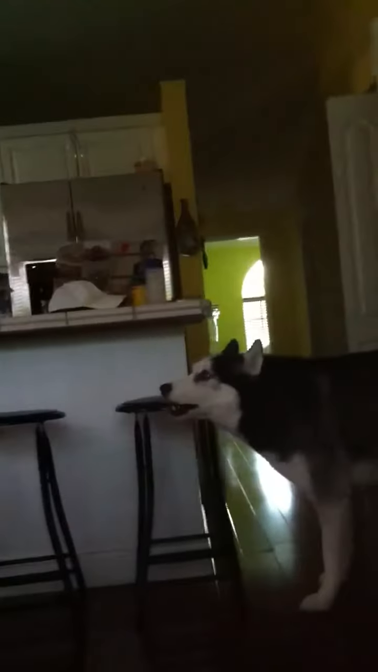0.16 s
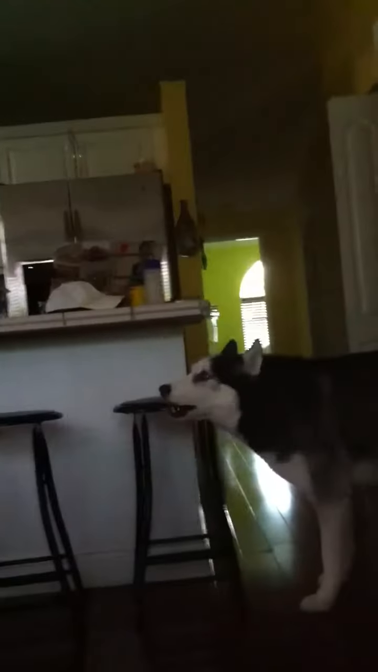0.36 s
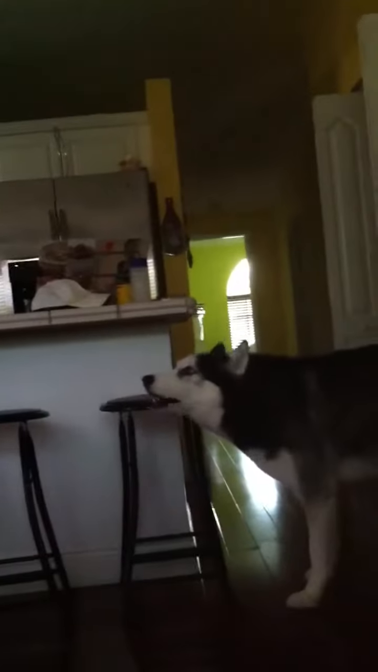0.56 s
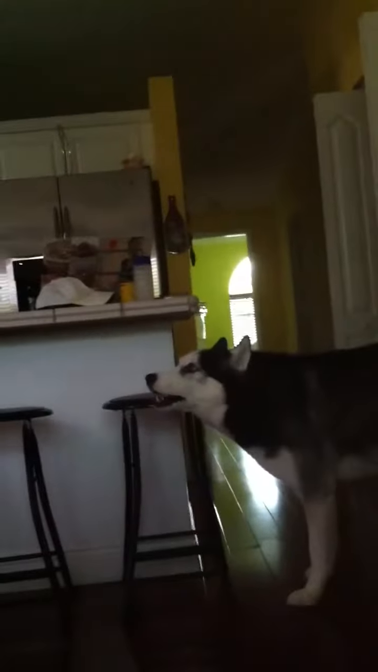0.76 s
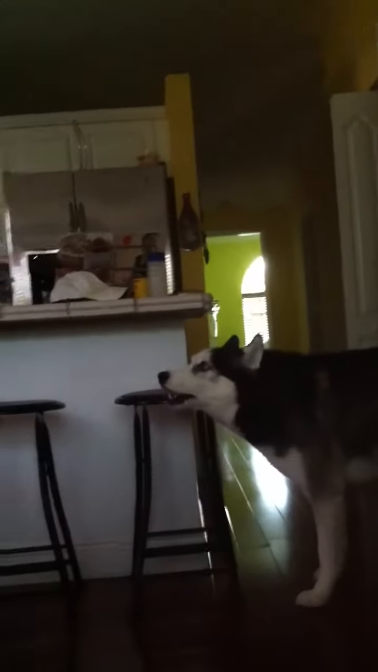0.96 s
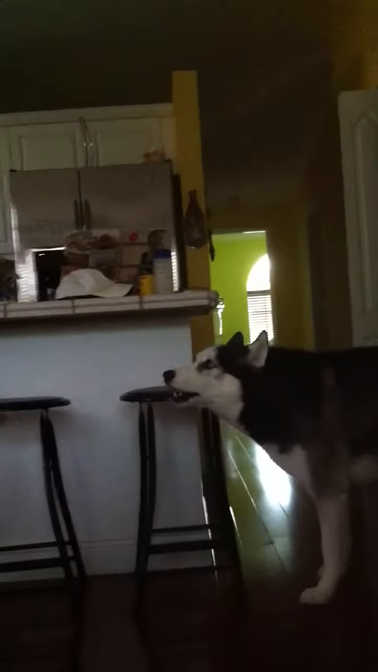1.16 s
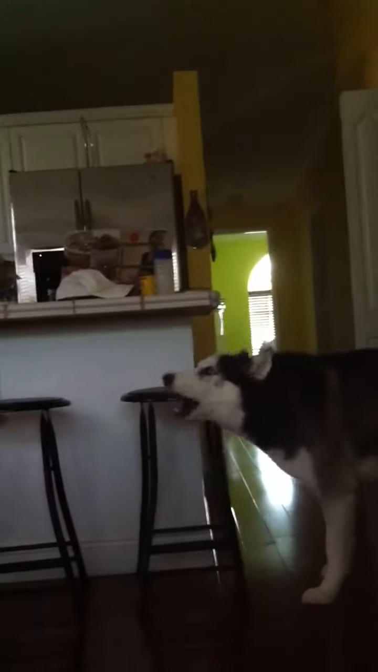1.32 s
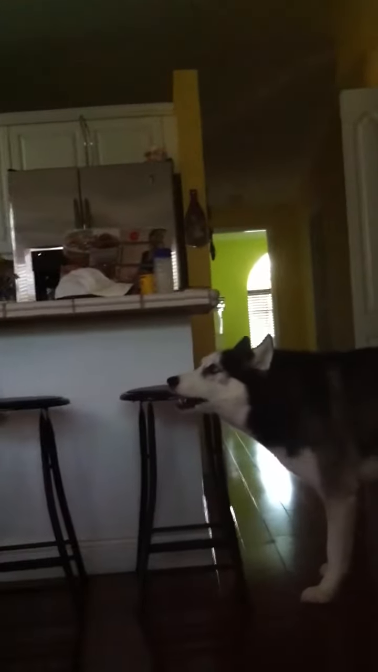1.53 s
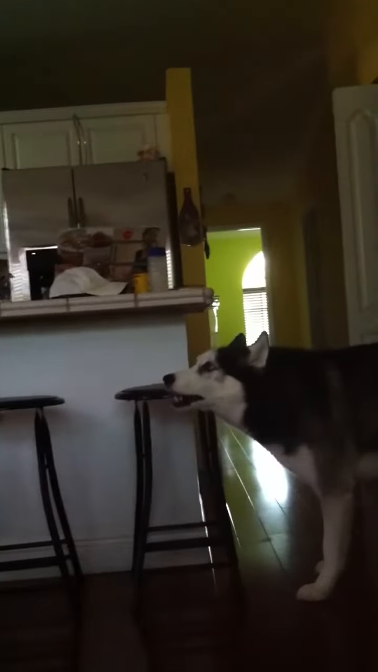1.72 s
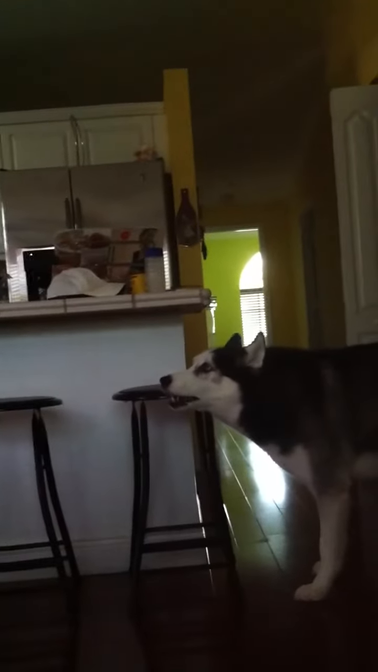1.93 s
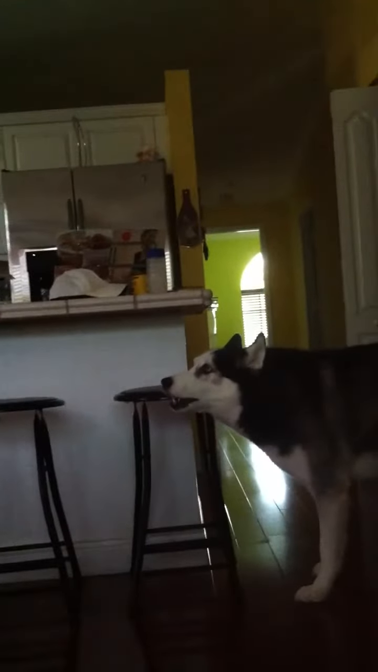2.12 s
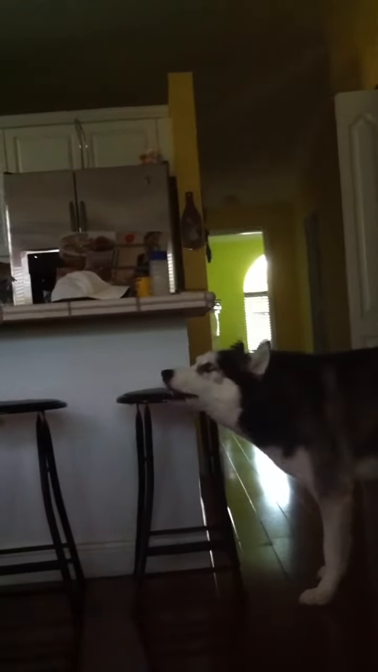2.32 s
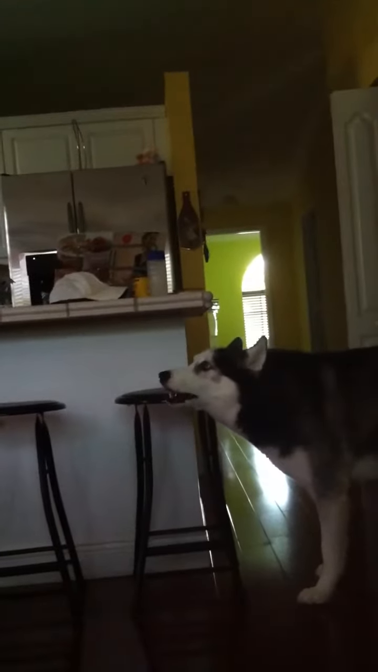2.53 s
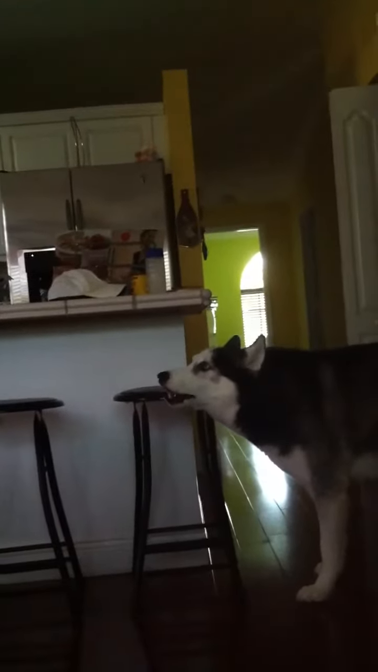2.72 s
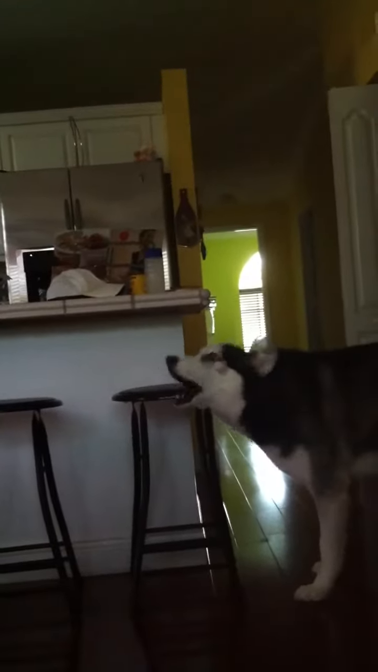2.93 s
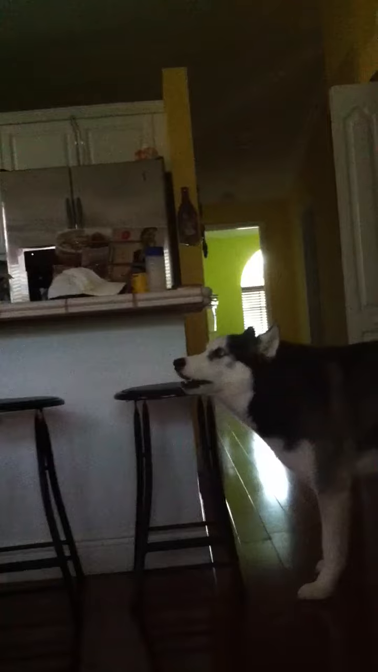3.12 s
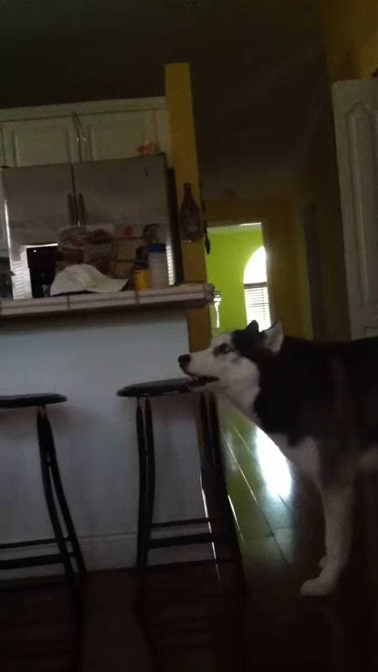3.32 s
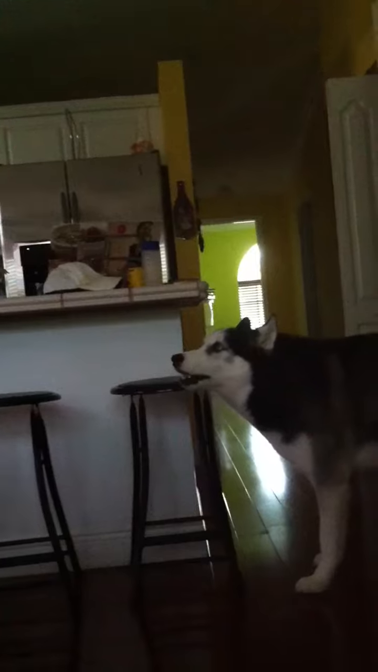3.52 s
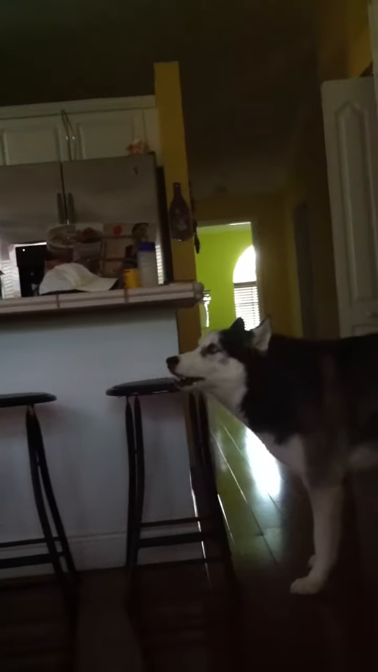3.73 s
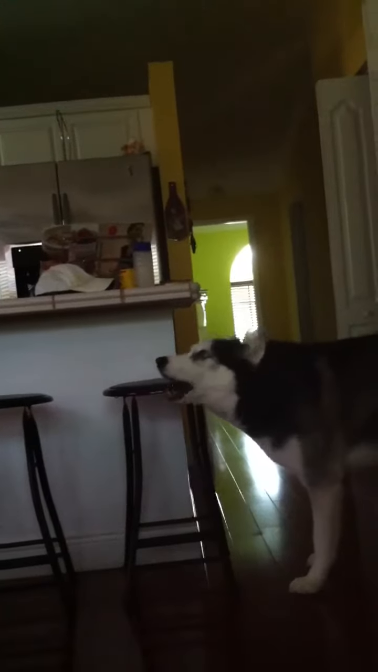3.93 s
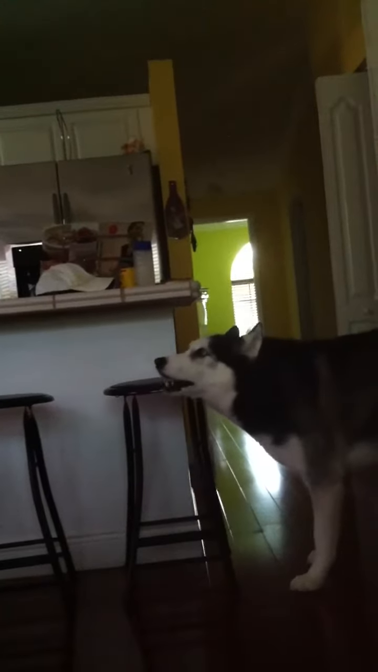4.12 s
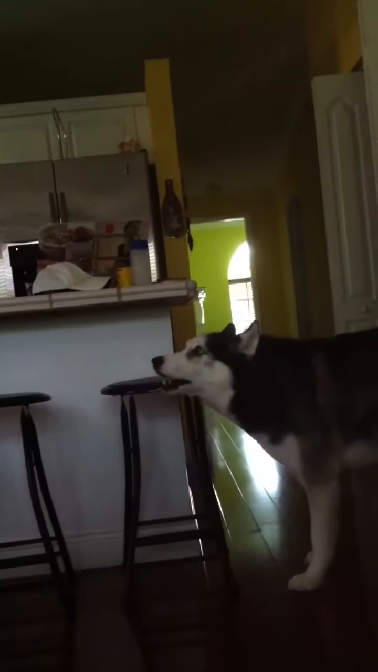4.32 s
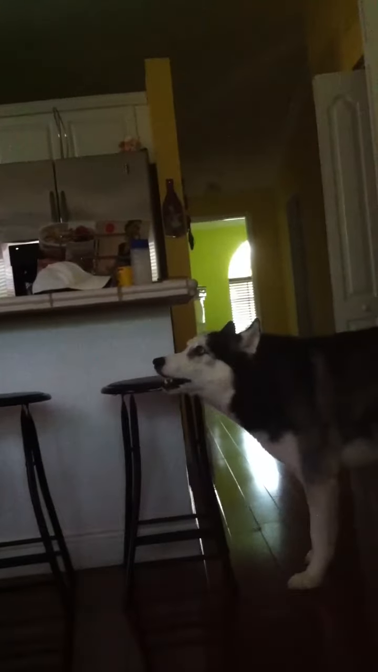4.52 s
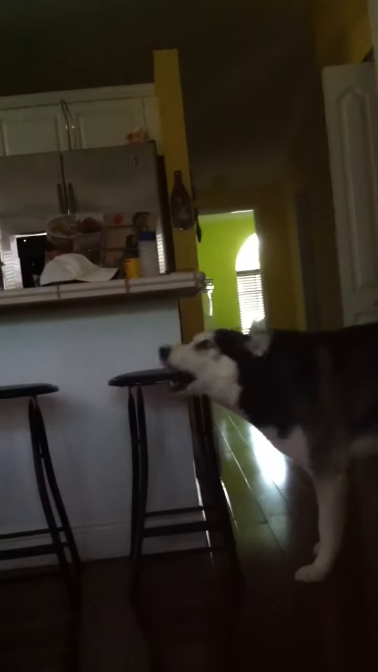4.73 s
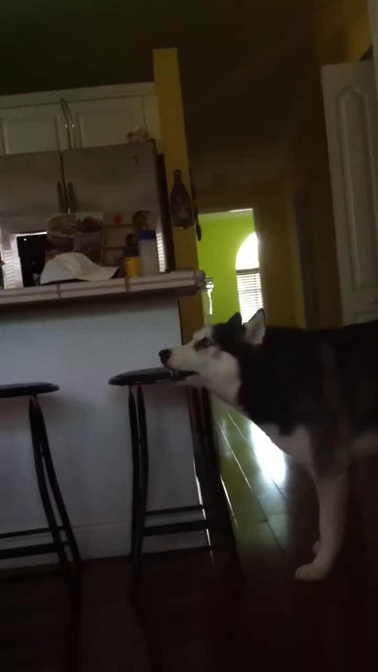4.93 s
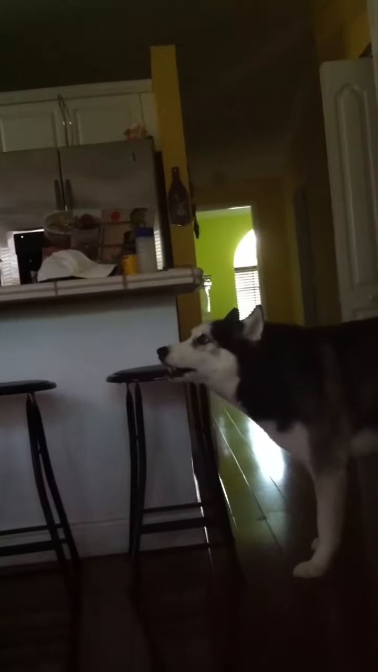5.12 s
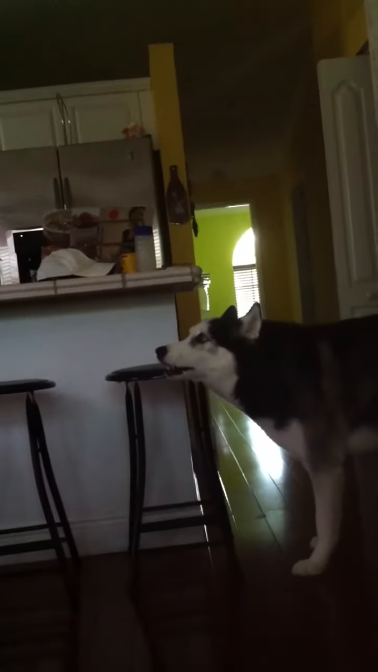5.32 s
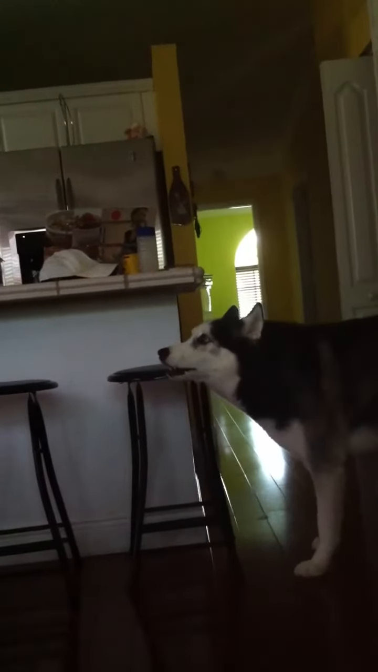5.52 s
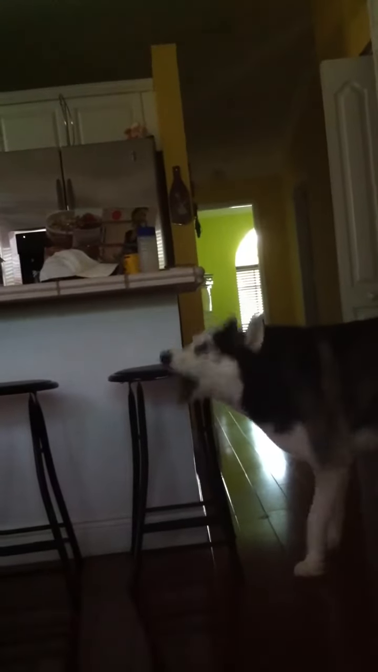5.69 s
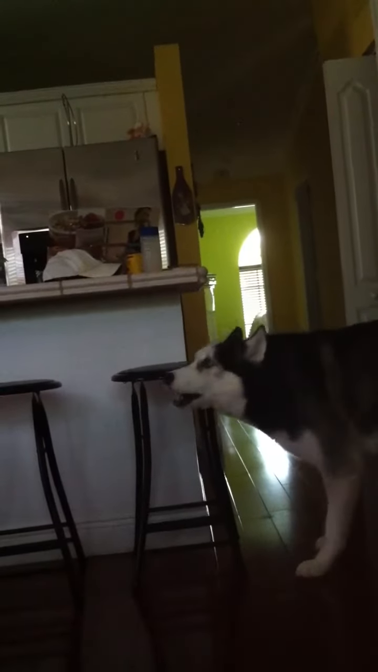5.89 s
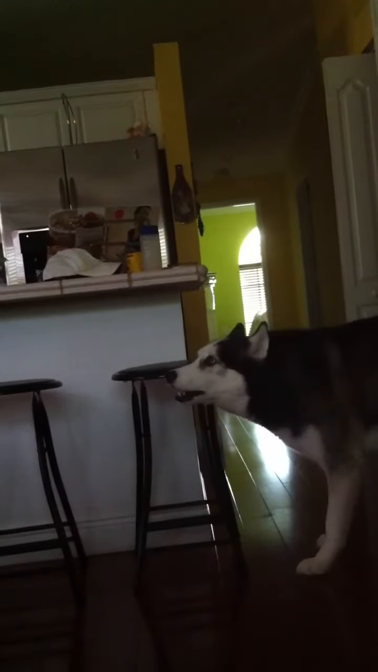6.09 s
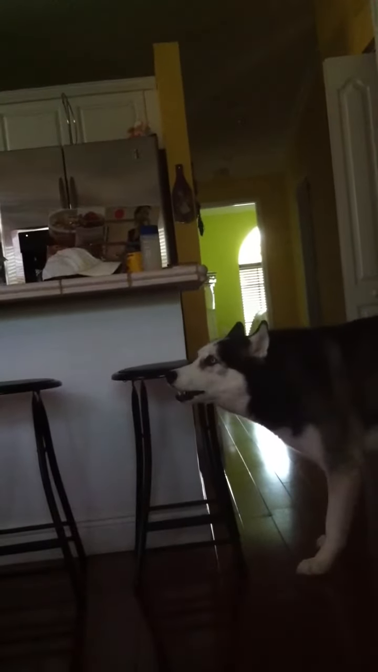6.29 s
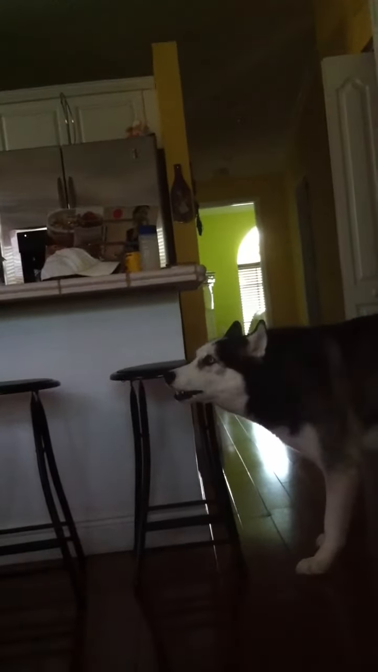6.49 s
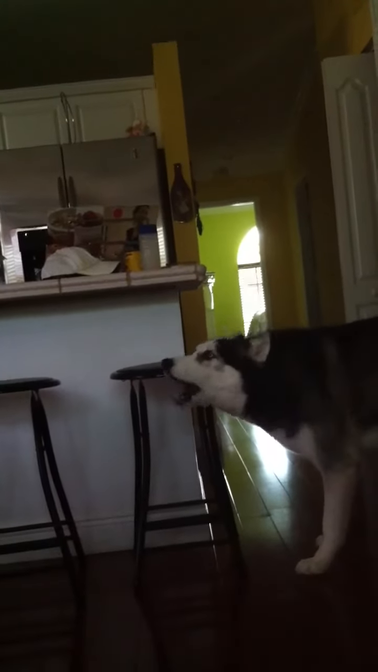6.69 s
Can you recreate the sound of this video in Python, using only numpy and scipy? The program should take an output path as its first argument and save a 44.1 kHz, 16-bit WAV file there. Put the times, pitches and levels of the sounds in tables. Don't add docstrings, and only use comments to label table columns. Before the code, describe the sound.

Echo first, then eight regular barks.

```python
import sys
import numpy as np
from scipy import signal
from scipy.fft import rfft, irfft
from scipy.io import wavfile
from scipy.ndimage import uniform_filter1d, minimum_filter1d

SR = 44100
rng = np.random.default_rng(int(sys.argv[2]) if len(sys.argv) > 2 else 0)


def level_to_linear(level):
    exponent = np.asarray(level, float) / 20
    return 10 ** exponent


def inscribe(sig):
    pcm = np.round(np.clip(np.atleast_2d(sig).T, -1, 1) * 32767)
    wavfile.write(sys.argv[1], SR, pcm.astype(np.int16))


N = 297675

# (voice breaks out [s], growl before it [s], swell to the crest [s], crest [dB],
# length after the crest [s])
BARKS = [
    (-.45, 0.053, 0.043, -4, 0.058),
    (.48, .08, 0.011, -7, 0.14),
    (1.314, .038, 0.025, -6, 0.094),
    (2.232, 0.051, 0.027, -8.5, 0.11),
    (2.953, .041, 0.0066, -4.5, 0.1),
    (3.915, 0.079, 0.0083, -7, 0.15),
    (4.724, .041, 0.026, -6, 0.085),
    (5.75, .033, 0.02, -7, 0.089),
    (6.688, .105, 0.011, -5.5, .1),
]
# (locked pitch [Hz], final pitch [Hz], roughness [0-1], half-pitch share [0-1])
VOICES = [(520, 545, .6, .4), (500, 575, .55, .4), (520, 580, .5, .45), (525, 572, .6, .5),
          (520, 570, .6, .45), (518, 585, .6, .4), (530, 540, .6, .5), (505, 535, .5, .45),
          (500, 530, .45, .4)]
# (mouth [dB], muzzle [dB], clear tone [dB], breath [dB])
COLOURS = [(-2, -1, 0.5, -46), (-0.5, -1.5, -1.5, -34.5), (-1, 1, 0, -32.5), (-1.5, 5, 0, -31.5),
           (0.5, 0.5, -3, -32.5), (-2.5, 2.5, 0, -32), (-1.5, 1, -2.5, -33), (-1.5, -2.5, 1, -32.5),
           (-2, -3, -0.5, -37.5)]
# (centre [Hz], width [Hz], level [dB])
THROAT = [(543.7, 262, -5), (743.5, 177, -6.5), (869, 150, -1), (952, 351, -12.5)]
# (centre [Hz], width [Hz], level [dB])
MOUTH_OPEN = [(1318, 354, 4), (1658, 440, -8)]
# (centre [Hz], width [Hz], level [dB])
MOUTH_SHUT = [(1428, 335, 10)]
# (centre [Hz], width [Hz], level [dB])
MUZZLE_OPEN = [(1915, 250, 12), (2338, 300, 5.5), (3090, 64, -3)]
# (centre [Hz], width [Hz], level [dB])
MUZZLE_SHUT = [(2337, 160, 4.5), (2880, 180, -15.5)]
# (centre [Hz], width [Hz], level [dB])
BREATH = [(4340, 840, -10.5), (5786, 530, -2.5), (6700, 600, -5.5), (10430, 2700, -12.5),
          (15400, 1600, -22)]
# (centre [Hz], width [Hz], level [dB])
CHEST = [(113, 49, -22.5), (185.5, 20, -13.5), (387, 76.5, 1)]
# (frequency [Hz], fall by 60 dB [s])
ROOM_RING = [(120, 0.52), (200, .7), (340, 0.56), (520, 0.76), (1000, 1), (2000, 1), (6000, 0.93),
             (11000, 0.51)]
# (frequency [Hz], level [dB], fall by 60 dB [s])
STANDING_WAVES = [(397, -59.5, 0.22), (453, -68, 0.56), (537.2, -55, 0.37), (569, -69, 0.84),
                  (716, -67, 0.15), (882.5, -62.5, 0.78), (982, -56.5, 0.76), (1364, -77, 0.54)]
# (frequency [Hz], density [dB per Hz])
HUSH_SPECTRUM = [(20, -46.5), (60, -31), (125, -8.5), (195, 1.5), (280, -5), (500, -12.5), (950, -15),
                 (1600, -2.5), (3000, -13), (6000, -16), (10000, -22), (13000, -24.5), (16000, -31.5)]

LEAD = SR // 2 + SR // 10
BREAK_DB, RISE_DB_PER_S, SAG_DB_PER_S, MURMUR_DB = -6, 619, 111.5, -48.5
OPENING_S, RELEASE_S = 0.0064, 0.017
GROWL_HZ, GROWL_SHARE = 156, .86
LEAP_AT_S, LEAP_S, LIFT_AT_S, LIFT_S = -.016, .026, .045, .045
MOUTH_DB, MOUTH_OPENS_DB, MOUTH_OPENS_S = -14, 12, 0.086
MUZZLE_DB, MUZZLE_RISE_DB_PER_S, MUZZLE_DROP_DB, MUZZLE_DROP_S = 1.5, 121.5, 13.5, 0.028
CLEAR_DB, CLEAR_DIP_DB, CLEAR_DIP_S = 0.5, 4.5, 0.05
THROAT_FLOOR_HZ, VOICE_TOP_HZ = 296, 3190
ROOM_DB, HUSH_DB = -2, -62
MIC_CUT_HZ, DRAIN_HZ, MIC_TOP_HZ = 56, 25.1, 16160
CEILING, HOLD = .71, 40


def dog():
    out = np.zeros(LEAD + N + SR)
    for timing, voice, colour in zip(BARKS, VOICES, COLOURS):
        start, sound = bark(timing, voice, colour)
        out[start:start + len(sound)] += sound
    return out


def bark(timing, character, colour):
    break_s, growl, swell, crest_db, length = timing
    lock_hz, final_hz, rough, half = character
    mouth_db, muzzle_db, clear_db, breath_db = colour
    t = -growl + np.arange(SR // 3) / SR
    before = np.minimum(t, 0)

    effort_db = crest_db + RISE_DB_PER_S * before + BREAK_DB * (1 - ramp(t, 0, swell))
    effort_db -= SAG_DB_PER_S * np.maximum(t - swell, 0)
    effort_db = np.where(t < 0, np.maximum(effort_db, MURMUR_DB), effort_db)
    pitch_hz = lock_hz * (GROWL_SHARE + (1 - GROWL_SHARE) * ramp(t, LEAP_AT_S, LEAP_S))
    pitch_hz += (final_hz - lock_hz) * ramp(t, LIFT_AT_S, LIFT_S)
    mouth_db = mouth_db + MOUTH_DB + MOUTH_OPENS_DB * np.clip(t / MOUTH_OPENS_S, -1, 1)
    muzzle_db = muzzle_db + MUZZLE_DB + MUZZLE_RISE_DB_PER_S * before
    muzzle_db = muzzle_db - MUZZLE_DROP_DB * ramp(t, 0, MUZZLE_DROP_S)
    clear_db = clear_db + CLEAR_DB - CLEAR_DIP_DB * np.exp(-(t / CLEAR_DIP_S) ** 2)

    since = t - t[np.argmax(effort_db > -24)]
    locked = ramp(since, 0, .045)
    jaws = ramp(since, .03, 0.082)
    voice, air, swing = folds(pitch_hz, locked, rough, half)

    throat_floor = signal.butter(4, THROAT_FLOOR_HZ, "high", fs=SR, output="sos")
    throat = signal.sosfilt(throat_floor, resonate(voice, THROAT))
    chest = level_to_linear(-1.5 - 14.1 * locked) * resonate(air, CHEST)
    sound = (throat + chest) / np.std(throat) + level_to_linear(clear_db + 6.0) * swing
    mouth = (1 - jaws) * resonate(voice, MOUTH_SHUT) + jaws * resonate(voice, MOUTH_OPEN)
    sound += level_to_linear(mouth_db) * rms_one(mouth)
    muzzle = (1 - jaws) * resonate(voice, MUZZLE_SHUT) + jaws * resonate(voice, MUZZLE_OPEN)
    sound += level_to_linear(muzzle_db) * rms_one(muzzle)
    sound = signal.sosfilt(signal.butter(6, VOICE_TOP_HZ, fs=SR, output="sos"), sound)
    hiss_db = breath_db + 5.34 * jaws + 2.2 * wander(len(t), 30)
    sound += level_to_linear(hiss_db) * rms_one(resonate(air, BREATH))

    opening = ramp(t, -growl, OPENING_S) ** 2
    closing = np.exp(-np.maximum(t - swell - length, 0) / RELEASE_S)
    start = round((break_s + t[0]) * SR) + LEAD
    return start, level_to_linear(effort_db - 4) * opening * closing * sound


def folds(pitch_hz, locked, rough, half):
    size = len(pitch_hz)
    turns = np.cumsum(pitch_hz * (1 + 0.033 * rough * wander(size, 60))) / SR
    closing = np.diff(np.floor(turns), prepend=0)
    strong_weak = 1 + half * (-1) ** np.floor(turns) * (1 + .5 * wander(size, 35))
    uneven = level_to_linear(11.25 * rough * rng.standard_normal(size))
    pulses = rms_one(closing * strong_weak * uneven)
    slaps = np.cumsum(GROWL_HZ * (1 + 0.27 * wander(size, 40))) / SR
    growl_puffs = np.exp(-2.5 * (slaps % 1))
    voice_puffs = np.exp(-1.5 * (turns % 1))
    puffs = growl_puffs * (1 - locked) + voice_puffs * locked
    air = rms_one(puffs * rng.standard_normal(size))
    noisy = 1 - locked * (1 - rough)
    voice = np.sqrt(1 - noisy ** 2) * pulses + noisy * air
    return voice, air, locked * np.sin(2 * np.pi * turns)


def resonate(x, modes):
    out = 0
    for k, (hz, width, level_db) in enumerate(modes):
        r = np.exp(-np.pi * width * 1.5 / SR)
        b = (1 - r * r) / 2 * np.array([1, 0, -1])
        a = [1, -2 * r * np.cos(2 * np.pi * hz / SR), r * r]
        rung = signal.lfilter(b, a, signal.lfilter(b, a, x))
        out = out + (-1) ** k * level_to_linear(level_db) * rung
    return out


def house():
    t = np.arange(int(1.6 * SR)) / SR
    edges = 60 * 2 ** np.arange(0, 8.4, 1 / 3)
    tail = 0
    for low, high in zip(edges, edges[1:]):
        band_pass = signal.butter(2, [low, high], "band", fs=SR, output="sos")
        band = signal.sosfilt(band_pass, rng.standard_normal(len(t)))
        tail = tail + band * level_to_linear(-60 * t / at_hz(ROOM_RING, np.sqrt(low * high)))
    tail *= ramp(t, .003, 0.0049) * (1 + 2.85 * np.exp(-t / 0.019))
    echoes = level_to_linear(ROOM_DB) * tail / np.sqrt(np.sum(tail ** 2))
    for hz, level_db, t60 in STANDING_WAVES:
        echoes += level_to_linear(level_db - 60 * t / t60) * np.sin(2 * np.pi * hz * t)
    echoes[0] = 1
    return echoes


def hush():
    hz = np.maximum(np.fft.rfftfreq(N, 1 / SR), 1)
    spectrum = rfft(rng.standard_normal(N)) * level_to_linear(at_hz(HUSH_SPECTRUM, hz))
    return level_to_linear(HUSH_DB) * rms_one(irfft(spectrum, N))


def wander(size, rate_hz):
    r = np.exp(-2 * np.pi * rate_hz / SR)
    chance = signal.lfilter([1], [1, -2 * r, r * r], rng.standard_normal(size + 3000))
    return rms_one(chance[3000:])


def ramp(t, start, length):
    return np.clip((t - start) / length, 0, 1)


def at_hz(points, hz):
    table_hz, values = np.array(points).T
    return np.interp(np.log(hz), np.log(table_hz), values)


def rms_one(x):
    return x / np.sqrt(np.mean(x ** 2) + 1e-20)


def scene():
    heard = signal.fftconvolve(dog(), house())[LEAD:LEAD + N]
    return (heard + hush())[None]


def roll_off(x):
    return signal.sosfilt(signal.butter(12, 15830, fs=SR, output="sos"), x)


def record(dry):
    x = signal.sosfilt(signal.butter(2, MIC_CUT_HZ, "high", fs=SR, output="sos"), dry)
    allowed = np.minimum(1, CEILING / (np.abs(x) + 1e-9))
    held = minimum_filter1d(allowed, 2 * HOLD + 1)
    duck = uniform_filter1d(uniform_filter1d(held, HOLD), HOLD)
    x = signal.sosfilt(signal.butter(1, DRAIN_HZ, "high", fs=SR, output="sos"), x * duck)
    x = signal.sosfilt(signal.cheby2(16, 60, MIC_TOP_HZ, fs=SR, output="sos"), x)
    return roll_off(x)


dry = scene()
out = record(dry)
inscribe(out)
```